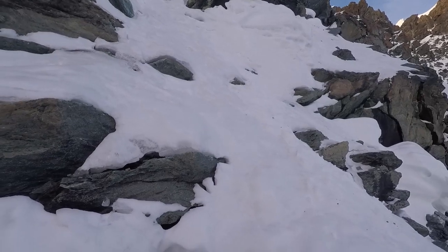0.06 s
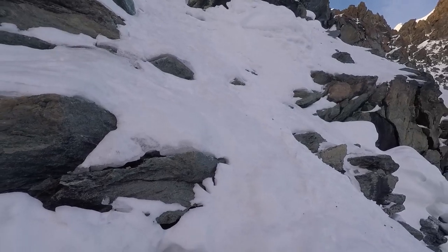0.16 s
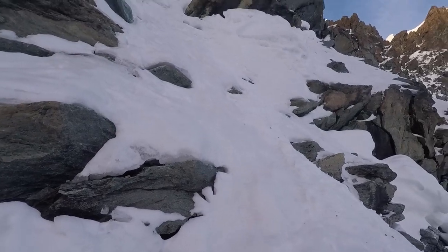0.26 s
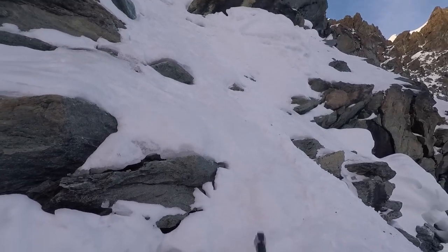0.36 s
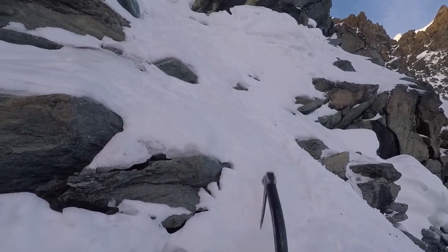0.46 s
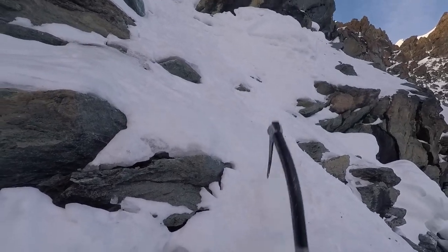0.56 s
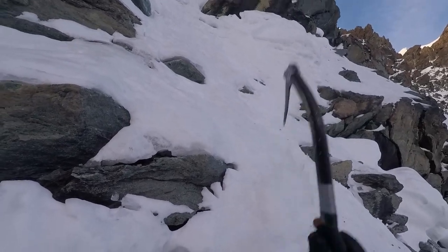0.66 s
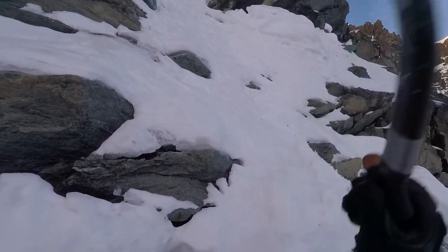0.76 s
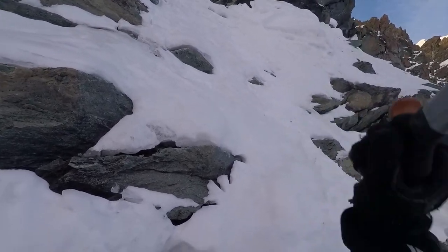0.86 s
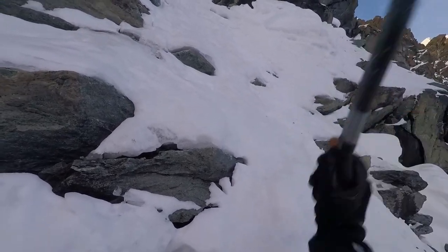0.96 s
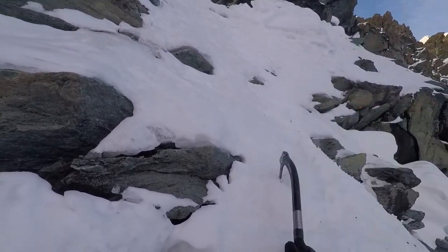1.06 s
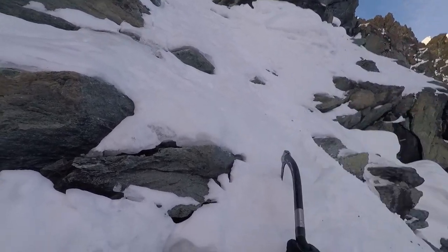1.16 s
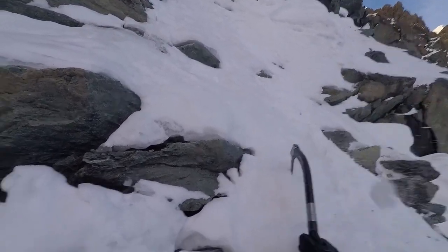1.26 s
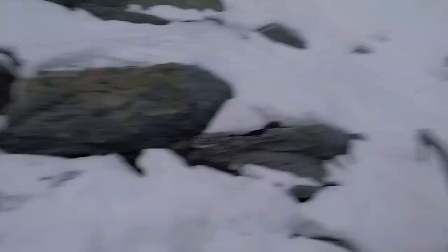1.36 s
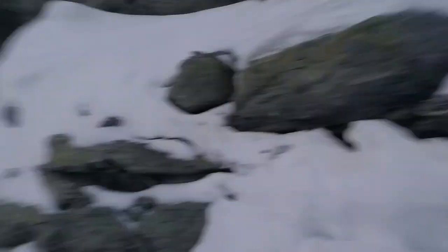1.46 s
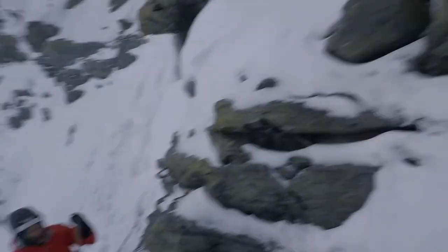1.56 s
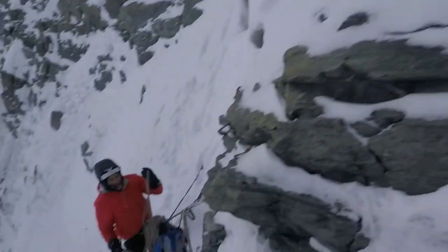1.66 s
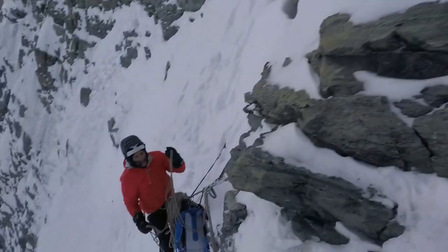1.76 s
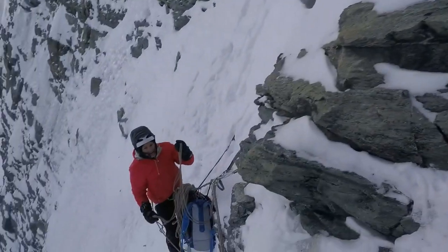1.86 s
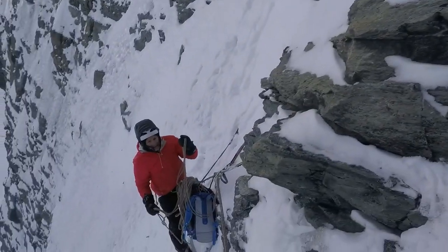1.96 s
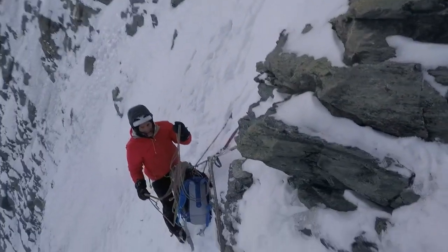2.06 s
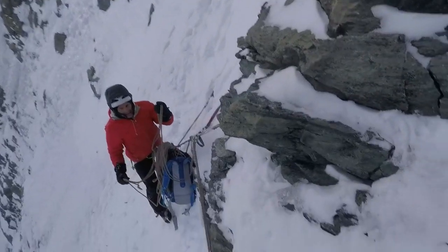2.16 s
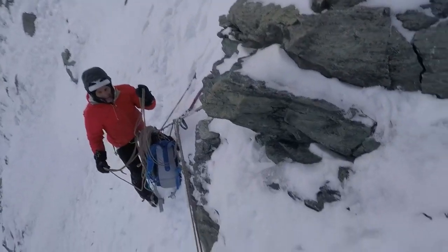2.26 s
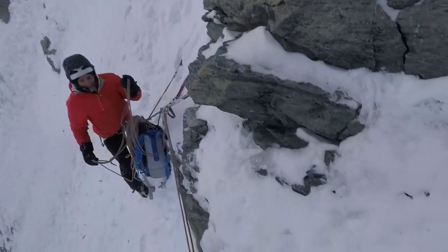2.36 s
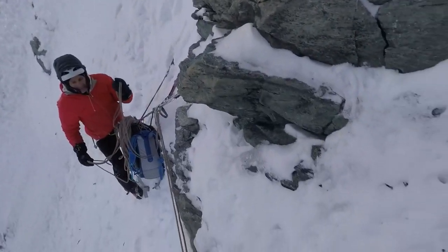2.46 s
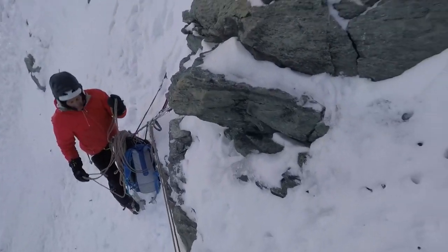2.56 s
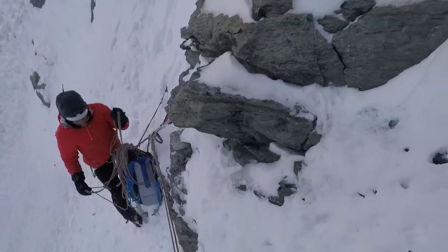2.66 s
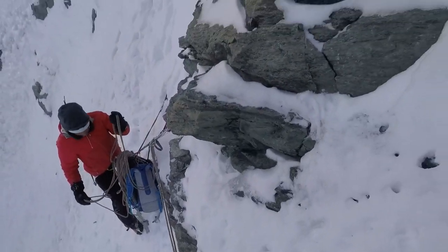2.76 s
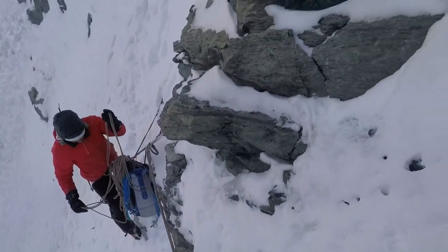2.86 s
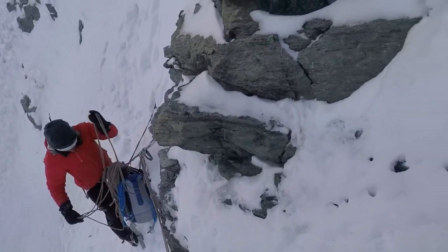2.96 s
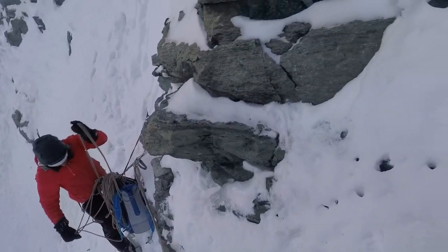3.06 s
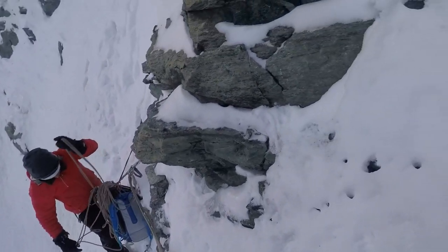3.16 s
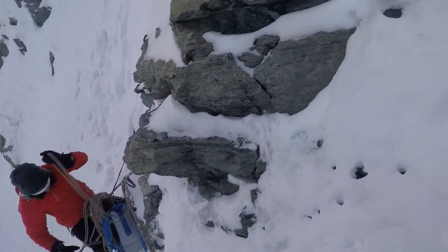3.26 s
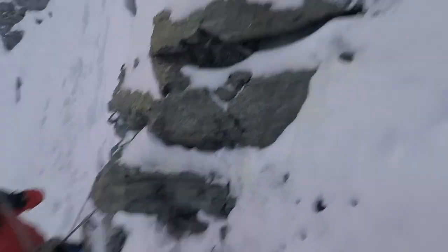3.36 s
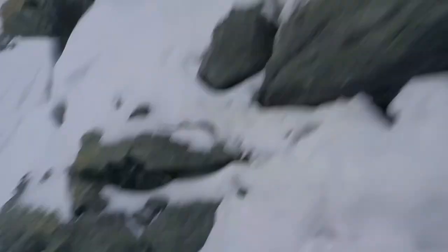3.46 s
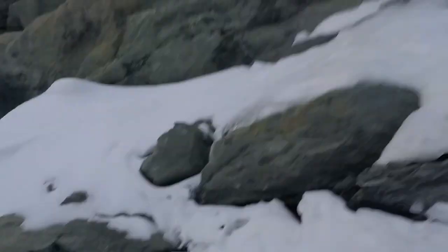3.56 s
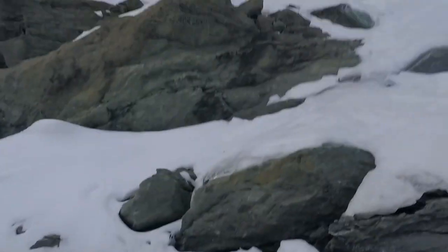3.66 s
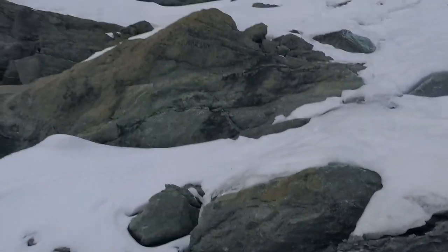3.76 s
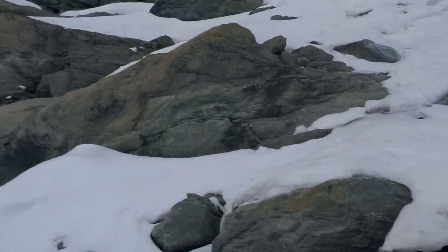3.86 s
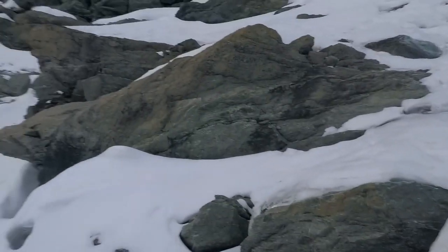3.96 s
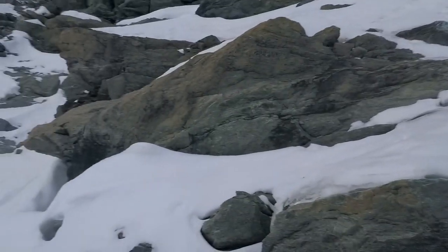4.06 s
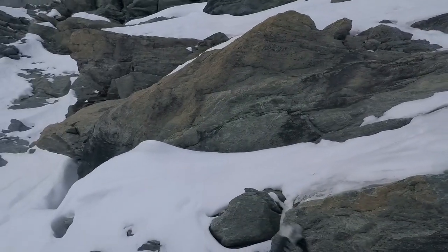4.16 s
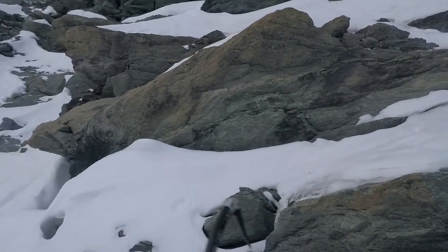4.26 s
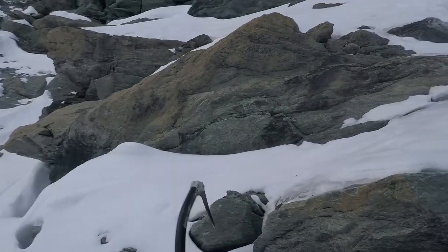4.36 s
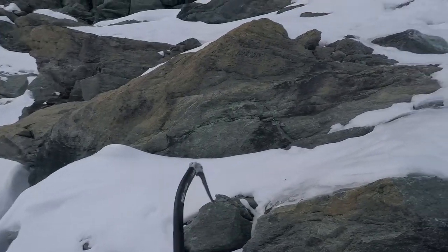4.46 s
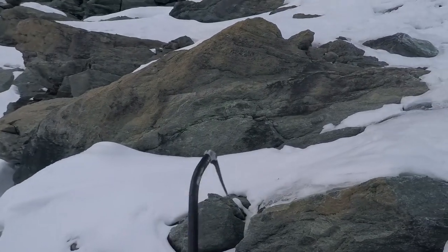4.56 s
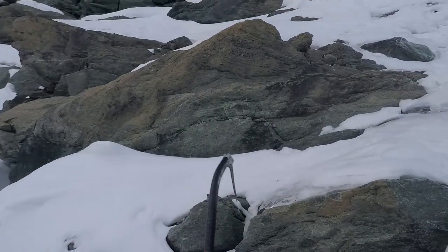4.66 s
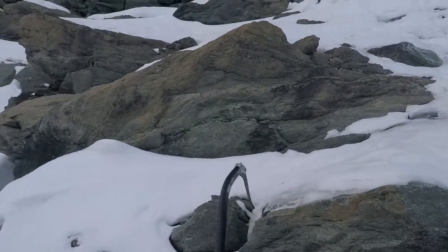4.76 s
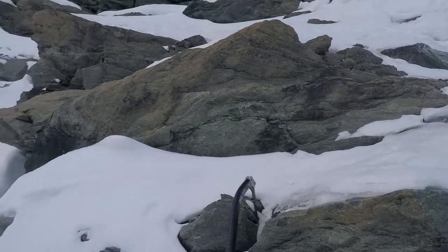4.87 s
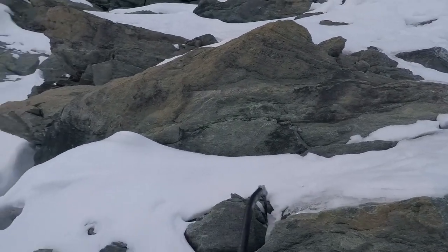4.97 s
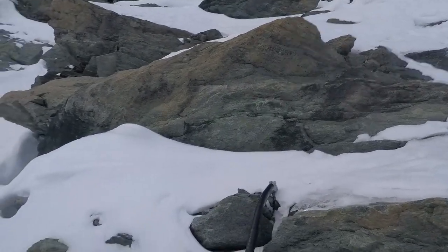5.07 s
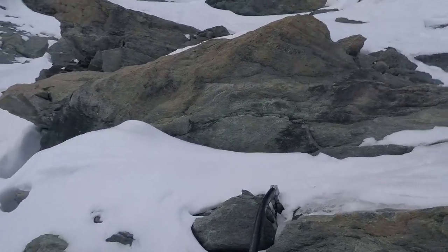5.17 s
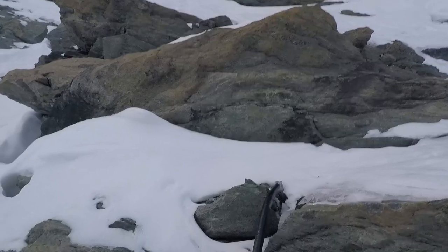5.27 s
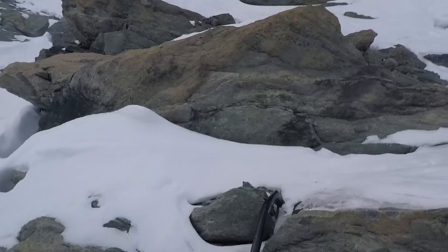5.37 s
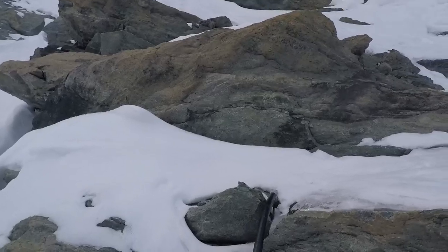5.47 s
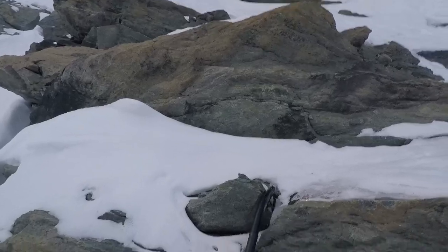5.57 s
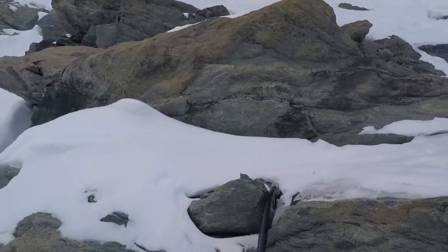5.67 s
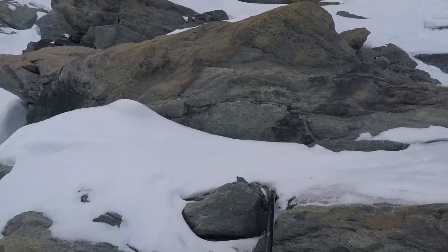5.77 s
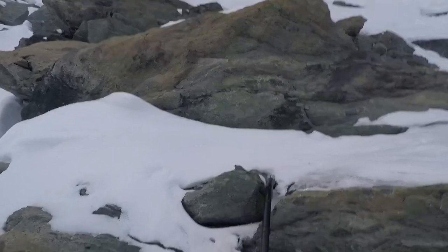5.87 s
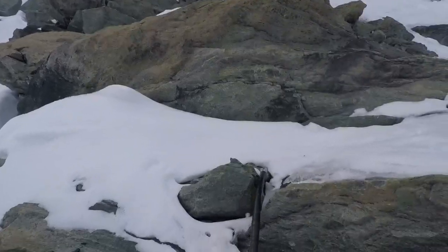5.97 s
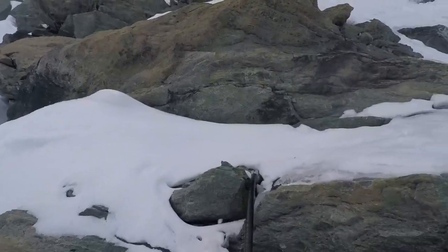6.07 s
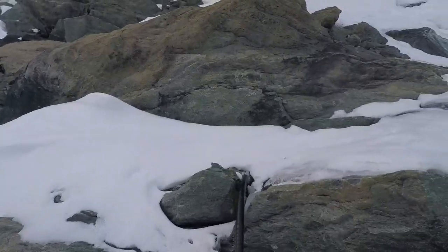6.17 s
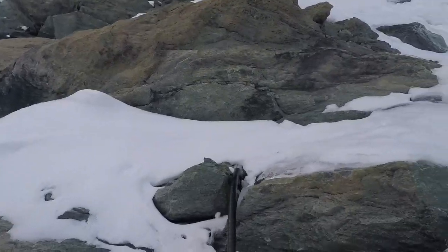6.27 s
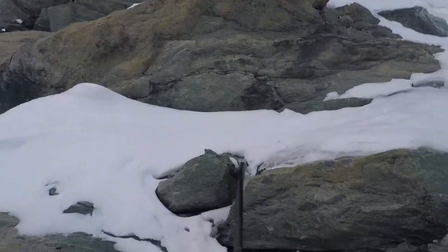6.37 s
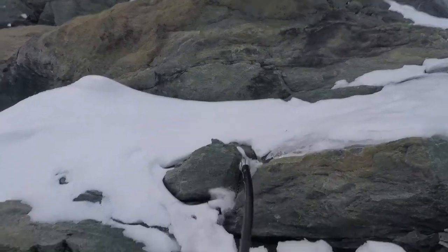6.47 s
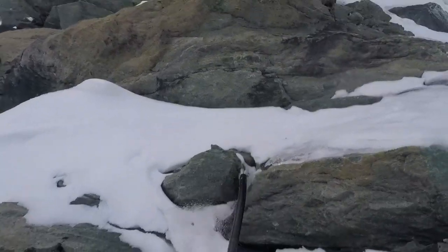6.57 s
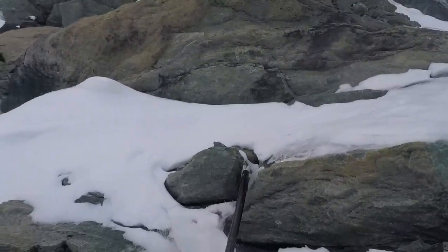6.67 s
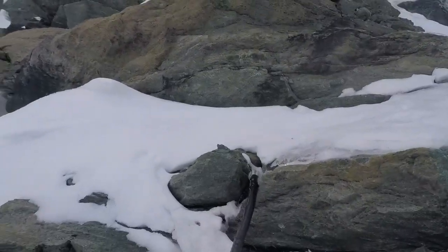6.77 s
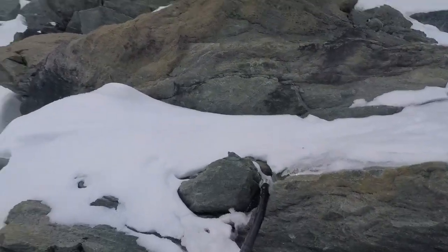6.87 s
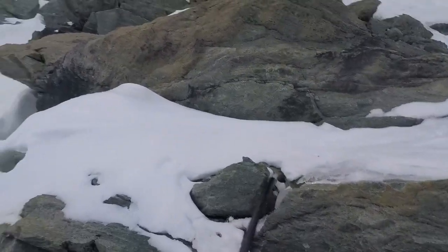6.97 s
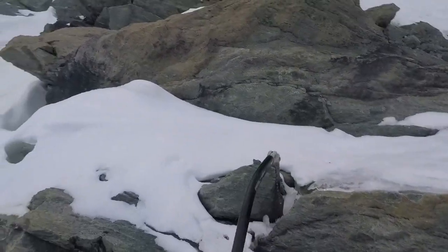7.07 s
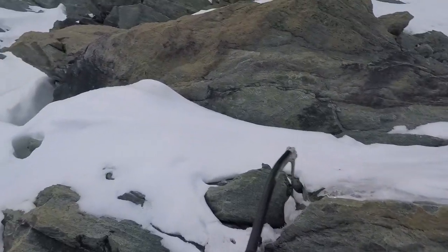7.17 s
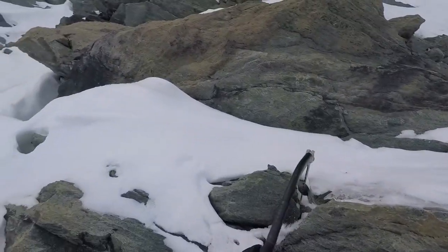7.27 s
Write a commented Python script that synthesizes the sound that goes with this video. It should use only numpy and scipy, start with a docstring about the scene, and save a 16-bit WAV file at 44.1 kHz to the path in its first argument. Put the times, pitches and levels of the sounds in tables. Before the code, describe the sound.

Fluttering low wind and faint hiss run throughout on an open snowy slope, heard close and dry from a helmet camera. Faint clinks and cloth rustle come first, then one sharp steel clank with a low thump. Small ticks, plastic creaks and a hood swish follow. Finally an ice axe chatters on rock in irregular clinks, peaking in a loud gritty scrape and hard knocks before thinning out.

```python
"""Low wind rumble, faint hiss and cloth rustle are heard first and run throughout; light steel clinks and
faint scraping start early, the strongest scraping comes late. A climber on a snowy slope taps an ice axe on
rock, hooks it in a crack and drags the pick along it: noise forces excite the steel's damped modes. Hardware
jingles; jacket and hood rustle as filtered grain noise. The helmet camera creaks (stick-slip) and thumps
(damped modes) in its mount; wind rumbles on its housing, and its electronics whine in regular pulses."""
import sys
import numpy as np
from scipy import signal
from scipy.fft import rfft, irfft
from scipy.io import wavfile
from scipy.ndimage import uniform_filter1d

SR = 44100
rng = np.random.default_rng(int(sys.argv[2]) if len(sys.argv) > 2 else 0)


def store_wav(level_fs):
    """Save 16-bit WAV to argv[1]."""
    pcm = np.round(np.clip(np.atleast_2d(level_fs), -1, 1) * 32767)
    wavfile.write(sys.argv[1], SR, pcm.T.astype(np.int16))


N = 322812
TIME = np.arange(N) / SR  # s
FIRM_DB = -45  # clank level of a firm blow: reference for its ring, ceiling for its rebound

# swings of the arm rock the camera: centre t/s, peak level/dB, f/Hz, half length/s
ARM_SWINGS = [(1.217, -12, 27.3, 0.032), (1.899, -33.5, 33, 0.012), (2.655, -25, 32, .014),
              (3.292, -25, 22.6, .036), (5.411, -27.5, 17.1, 0.035), (6.475, -31, 22.3, 0.067),
              (6.664, -23.5, 25, 0.026)]


def undb(db):
    """Amplitude gain is ten to the power of level/20."""
    return 10 ** (np.asarray(db) / 20)


def unit(x):
    """Normalise the mean power to one (rms 1)."""
    return x / np.sqrt(np.mean(x ** 2) + 1e-20)


def colour(x, points):
    """Minimum-phase filtering through (f/Hz, level/dB) points: a folded cepstrum keeps it causal."""
    size = 4096
    hz, db = np.transpose(points)
    grid = np.maximum(np.arange(size // 2 + 1) * SR / size, 1)
    level_db = np.interp(np.log(grid), np.log(hz), db)
    cepstrum = irfft(np.log(undb(level_db)))
    cepstrum[1:size // 2] *= 2
    cepstrum[size // 2 + 1:] = 0
    impulse_response = irfft(np.exp(rfft(cepstrum)))
    return signal.fftconvolve(x, impulse_response)[:len(x)]


def add(out, s, x):
    """Linear superposition: mix x into out from time s."""
    i = max(int(s * SR), 0)
    out[i:i + len(x)] += x[:max(N - i, 0)]


def grains(rate, spread_db):
    """Shot noise: random tiny impacts, a few much larger than the rest; rms 1."""
    sizes = undb(spread_db * np.minimum(rng.exponential(size=N), 4))
    hits = rng.random(N) < rate / SR
    return unit(hits * sizes * rng.choice([-1, 1], N))


def steady(x, seconds):
    """Short-time power normalisation evens out a noise's slow swings of level."""
    power = uniform_filter1d(x ** 2, max(int(seconds * SR), 2))
    return x / np.sqrt(power + 1e-9)


def walk(rate):
    """Slow random modulation: levels drawn rate times a second, joined by slopes; rms 1."""
    k = int(SR / rate)
    held = np.repeat(rng.standard_normal(N // k + 1), k)
    return unit(uniform_filter1d(held, k)[:N])


def strokes(rows, attack_s, release_s):
    """Exponential envelopes of (t/s, length/s, level/dB) movements: each rises, holds and dies away."""
    gain = np.zeros(N)
    for s, length, db in rows:
        outside = np.maximum(s - TIME, 0) / attack_s + np.maximum(TIME - s - length, 0) / release_s
        gain = np.maximum(gain, undb(db) * np.exp(-outside))
    return gain


def clinks(rattle_db=-22, rattle_s=0.012, grip=1.85, scuff_db=-17, scuff_s=0.0014, patchy_db=5.5):
    """Impact excitation: steel scuffs, bites and chatters; each blow balances clank, bite and sparkle."""
    chatter_ms, chatter_per_skid = 4.14, 0.6  # decay time in ms, and extra ms per ms of skid
    ring_at_firm_db, ring_per_db = -7.5, -0.15  # a harder blow presses the steel down and rings less
    out, lead = np.zeros(N), SR // 60  # lead leaves room for the scuff before contact
    t = TIME[:SR // 4] - lead / SR
    patches_hz = np.linspace(1400, 9000, 24)
    clank_band = signal.butter(2, [1200, 3400], "band", fs=SR, output="sos")
    for s, clank_db, bite_db, sparkle_db, skid_ms in blows():
        skid = max(skid_ms, .3) / 1000
        chatter = (chatter_ms + chatter_per_skid * skid_ms) / 1000
        since = np.maximum(t - skid, 0)
        decay = np.exp(-since / chatter) + undb(rattle_db) * np.exp(-since / rattle_s)
        scuff = undb(scuff_db) * np.exp(-np.abs(t) / scuff_s)
        pressure = np.clip(t / skid, 0, 1) * decay + scuff
        # every point of contact stresses different overtones
        patches = np.column_stack([patches_hz, patchy_db * rng.standard_normal(len(patches_hz))])
        force = colour(pressure * rng.standard_normal(len(t)), [(1200, 0), *patches, (10000, 0)])
        ring_db = ring_at_firm_db + ring_per_db * (clank_db - FIRM_DB)
        tone = [(2800, 0), (4500, bite_db), (6000, bite_db), (7800, sparkle_db + 12.0)]
        blow = colour(axe(force, ring_db, grip), tone)
        # the clank band just after contact sets the level of the whole blow
        clank = signal.sosfilt(clank_band, blow)[lead:lead + SR // 80]
        add(out, s - lead / SR, undb(clank_db) * blow / clank.std())
    return out


def blows():
    """Repeated contact: every blow has a soft rebound, and swinging hardware touches at random."""
    # steel on stone or other hardware: t/s, clank level/dB, bite re clank/dB,
    # sparkle re clank before a 12 dB lift/dB, skid-in/ms
    impacts = [(0.234, -56, -1, -9, 13.8), (0.263, -53.5, 1, -6, 1.6), (0.384, -54.5, 9, -7, 1.6),
               (0.445, -67, 12, -2, 1), (0.467, -65, 5, -6, 2.5), (1.1429, -31.5, 2, -7, 1.9),
               (3.218, -46, -2.5, -15, 8.8), (4.972, -45, 12, 2, 0.37), (4.987, -50.5, -1, -18, 0.37),
               (5.021, -50, -3, -16, 6), (5.035, -51.5, 13, -14, 1.1), (5.046, -45.5, -25, -20, 0.45),
               (5.074, -54.5, 7, -6, 0.37), (5.089, -51.5, 3, -15, 1.8), (5.187, -47.5, 7.5, -15, 3.8),
               (5.216, -58.5, -4, -15, 0.73), (5.274, -57, 7, -12, 0.9), (5.285, -43.5, 0, -19, 0.62),
               (5.378, -45, 6, -3, 9.3), (5.581, -58, 2, -12, 1.3), (5.618, -49, 7.5, -6, 3.7),
               (5.677, -61.5, 12, -11, 0.83), (5.785, -45.5, 0.5, 1.5, 0.44), (5.95, -53.5, -8, -27, 1),
               (6.023, -50.5, 5, -8, 3.3), (6.292, -48, 9, -19, 6.5), (6.418, -53, 16, -7, 1.2),
               (6.4395, -43.5, 25, -6, 2.3), (6.4595, -34.5, 9, -2, 0.72), (6.488, -41.5, 23, -10, 1.5),
               (6.546, -32.5, 5.5, -13.5, 5.3), (6.624, -48, 2, -12, 1.5), (6.639, -35, -3, -19, 3),
               (6.8256, -51.5, 1.5, -15, 1.4), (6.844, -51, 4.5, -18, 0.66), (6.861, -43.5, -18, -29, 2.1),
               (7.024, -66.5, 22, 7, 3.1), (7.087, -52, -4, -12, 0.83), (7.114, -38, 0, -15, 0.92),
               (7.2215, -44, -3, -14, 1.5), (7.238, -51, 11, -11, 4.9)]
    # hardware jingles faintly while the climber shifts: t/s, length/s
    jingle_spans = [(5.552, .14), (6.653, .05), (7.045, .2)]
    rebound_s, rebound_spread_s, rebound_db = 0.011, .03, -20
    jingles_per_s, jingle_db, jingle_bite_db, jingle_sparkle_db = 22, -61.5, 2, -5
    rows = list(impacts)
    for (s, db, bite_db, sparkle_db, skid_ms), late in zip(impacts, rng.random(len(impacts))):
        rebound_at = s + rebound_s + rebound_spread_s * late
        rows.append((rebound_at, min(db, FIRM_DB) + rebound_db, bite_db, sparkle_db, skid_ms))
    for start, length in jingle_spans:
        for slot in np.arange(0, length, 1 / jingles_per_s):
            touch_at = start + slot + rng.random() / jingles_per_s
            touch_db = jingle_db + 2 * rng.standard_normal()
            rows.append((touch_at, touch_db, jingle_bite_db, jingle_sparkle_db, 1))
    return rows


def axe(force, ring_db, grip, scatter_db=1.0):
    """Modal synthesis: a dry crack plus the ringing of the steel; a firmer grip damps it sooner."""
    # modes of the axe: f/Hz before slight detuning, relative level/dB, t60 at grip 1/s
    modes = [(1440, 0, .07), (2060, 2, .07), (2398, 4, .14), (2460, 4, .13), (2660, 3, .1), (3120, 8, .1),
             (3640, 4, .06), (4330, 8, .12), (4558, 9, .13), (4796, 6, .12), (5400, 3, .08), (5600, 4, .1),
             (5860, 10, .17), (5941, 5, .13), (6551, 8, .12), (6582, 8, .17), (7073, 7, .18),
             (7280, 10, .12), (7418, 6, .18), (7957, 14, .16), (8830, 7, .05), (11430, 8, .05)]
    # spectrum of steel on stone: f/Hz, level/dB
    crack = [(300, -29.5), (720, -15.5), (1220, -13), (1400, 4), (3050, 2.5), (3350, -3.5), (4500, 0.5),
             (5100, -5), (6200, -4.5), (6800, -9), (8800, -16), (9600, -20.5), (12000, -32.5),
             (15000, -25.5)]
    t = TIME[:SR // 5]
    hz, db, t60 = np.array(modes).T[:, :, None]
    damping = max(grip, .5) * np.log(1000) / t60
    # where the steel is touched decides which modes speak, and detunes them a little
    weight = undb(db + scatter_db * rng.standard_normal(db.shape))
    hz = hz * (1 + .0025 * rng.standard_normal(db.shape))
    phase = rng.random(db.shape)  # cycles
    partials = np.exp(-damping * t) * np.sin(2 * np.pi * (hz * t + phase))
    ring = (2 * damping / SR * weight * partials).sum(axis=0)
    ringing = signal.fftconvolve(force, ring)[:len(force)]
    return colour(force + undb(ring_db) * ringing, crack)


def drag(count=7, ring_db=1, shift_db=7, grip=1.66):
    """Frictional excitation: grain impacts at several contacts, with shifting load, ring the pick."""
    # strokes of the pick over rock: t/s, length/s, level/dB
    pick_strokes = [(.225, 0.027, -61), (.39, 0.072, -62), (5.31, 0.069, -60.5), (5.83, 0.13, -54),
                    (6.12, 0.2, -64.5), (6.315, 0.057, -50), (6.44, 0.073, -29), (6.55, 0.14, -52.5)]
    scrape = np.zeros(N)
    for _ in range(count):
        force = grains(rate=350, spread_db=1.5) * undb(shift_db * walk(rate=60))
        scrape += axe(unit(force), ring_db, grip, scatter_db=3.5)
    scrape = colour(scrape, [(1500, -1.5), (4300, 2.0), (6200, 1.5), (8000, 6.5), (11000, -1)])
    return steady(scrape, 0.068) * strokes(pick_strokes, attack_s=0.0095, release_s=0.025)


def creaks(count=9, slip_ms=1.29, jitter=0.39, settle_ms=0.75):
    """Stick-slip friction: plastic slips about every 1.3 ms, harder up to the snap, then settles."""
    # creaks of the mount: snap t/s, level/dB, brightness f/Hz, build-up/ms, body level/dB
    snaps = [(1.2273, -46.5, 1680, 4.8, -18), (1.7246, -32.5, 3500, 1.73, -9), (2.5362, -47, 1370, 3, -15),
             (2.5416, -43, 1460, 2.5, -14), (3.522, -45.5, 1940, 3.6, -3.5),
             (3.564, -39.5, 1350, 2.9, -3.5), (3.5867, -41, 1460, 9.3, -6), (5.311, -48.5, 1570, 1.5, -1),
             (5.317, -37, 1670, 3.3, -1.5)]
    # spectrum of the camera shell: f/Hz, level/dB
    shell_response = [(300, 4), (400, 5), (540, 1), (740, 2), (930, -3.5), (1130, 0.5), (1320, 0.5),
                      (1550, 2), (2000, -1.5), (2800, 3), (4000, 0)]
    out, size, lead = np.zeros(N), SR // 40, SR // 100
    order = np.arange(count) - 2 * count // 3  # zero is the snap
    for s, db, bright_hz, build_ms, body_db in snaps:
        ms = slip_ms * (order + jitter * rng.standard_normal(count) * (order != 0))
        slips = np.zeros(size)
        places = np.clip(lead + (ms * SR / 1000).astype(int), 0, size - 1)
        slips[places] = np.exp(np.where(ms < 0, ms / max(build_ms, .3), -ms / settle_ms))
        body = [(60, body_db - 36), (200, body_db + 0.5), (380, body_db + 1)]
        rolloff = [(.5 * bright_hz, 0), (bright_hz, -3), (1.7 * bright_hz, -14),
                   (3.0 * bright_hz, -30), (7 * bright_hz, -52)]
        creak = colour(colour(slips, body + rolloff), shell_response)
        add(out, s - lead / SR, undb(db) * unit(creak))
    return out


def ticks():
    """Short broadband impulses: exponentially decaying bright noise, dry and without ringing."""
    # buckles and ice crumbs: t/s, nominal peak level/dB
    tick_times = [(1.467, -48), (1.544, -39.5), (1.5893, -46), (2.4307, -43.5), (2.774, -46), (2.9528, -47),
                  (3.015, -41), (3.1105, -42), (3.3873, -36.5), (3.4703, -44), (4.075, -47.5),
                  (4.385, -44.5)]
    spectrum = [(1000, -2.5), (2500, 5.5), (4500, 3.5), (9000, -6.5), (15000, -13)]
    out, t = np.zeros(N), TIME[:SR // 20]
    for s, peak_db in tick_times:
        tick = unit(colour(rng.standard_normal(len(t)), spectrum))
        # noise peaks stand about 10.5 dB over its rms
        add(out, s, undb(peak_db - 10.5) * tick * np.exp(-t / 0.0063))
    return out


def bumps():
    """Damped resonance: body movements make the camera bounce briefly on its mount."""
    # body movements: t/s, level before the sum of modes/dB
    knocks = [(0.384, -50.5), (0.742, -48.5), (1.171, -49), (1.211, -27.5), (1.725, -45.5), (3.52, -41),
              (3.56, -42.5), (3.953, -42.5), (4.689, -49), (5.253, -46.5), (5.316, -45.5), (5.479, -40.5),
              (5.599, -43), (5.691, -47), (5.902, -45.5), (5.981, -41.5), (6.366, -40), (6.44, -43),
              (6.542, -39.5), (6.629, -31.5), (6.687, -36)]
    # modes of the camera on its mount: f/Hz, level/dB, t60/s
    mount_modes = [(69.6, 1.5, 0.19), (126.7, 3, 0.14), (390, -12.5, 0.049), (727, -10.5, 0.049)]
    out, t = np.zeros(N), TIME[:SR // 4]
    bounce = np.zeros(len(t))
    for hz, db, t60 in mount_modes:
        bounce += undb(db) * np.sin(2 * np.pi * hz * t) * np.exp(-np.log(1000) * t / t60)
    soft_onset = 1 - np.exp(-t / 0.0046)
    for s, knock_db in knocks:
        add(out, s, undb(knock_db) * bounce * soft_onset)
    return out


def sways():
    """Low-frequency oscillation in a Gaussian envelope: the camera rocks with each arm swing."""
    out = np.zeros(N)
    for s, peak_db, hz, half in ARM_SWINGS:
        envelope = np.exp(-.5 * ((TIME - s) / half) ** 2)
        out += undb(peak_db) * envelope * np.cos(2 * np.pi * hz * (TIME - s))
    return out


def rustle(points, rate, spread_db, clump_db):
    """Granular friction: dense little catches of fibres that come in clumps."""
    catches = grains(rate, spread_db) * undb(clump_db * walk(rate=70))
    return unit(colour(catches, points))


def jacket(rest_db=-71):
    """Fibre friction: arm and shoulder movements add in power to a faint constant rustle."""
    # arm and shoulder movements: t/s, length/s, level/dB
    moves = [(0, 0.43, -68.5), (1.12, 0.13, -58), (1.43, 0.37, -62.5), (2.33, 0.11, -61.5),
             (2.6, 0.31, -70), (3.41, 0.15, -51), (3.91, .17, -60.5), (5.33, 0.075, -58.5),
             (5.85, 0.88, -66)]
    # spectrum of the cloth: f/Hz, level/dB
    cloth = [(200, -16), (500, -16), (720, -9), (1000, -18), (1300, -14), (1550, -2), (1780, 0), (2100, -9),
             (2650, -7), (3400, -18), (6000, -24), (12000, -36)]
    movement = np.hypot(strokes(moves, attack_s=0.039, release_s=0.04), undb(rest_db))
    return rustle(cloth, rate=4000, spread_db=3.5, clump_db=3.0) * movement


def hood():
    """Fibre friction: the hood brushes the helmet as the head turns."""
    # brushes of the hood: t/s, length/s, level/dB
    swishes = [(3.585, 0.12, -49.5), (3.75, 0.053, -54.5)]
    # spectrum of hood on helmet: f/Hz, level/dB
    brush = [(300, -28), (1150, -10.5), (1600, 3.5), (2600, 1), (3200, -8.5), (3700, -3), (4600, -3),
             (5200, -9), (5800, -3), (6700, -23), (7600, -8), (9000, -20.5), (15000, -33)]
    movement = strokes(swishes, attack_s=0.03, release_s=0.023)
    return rustle(brush, rate=3000, spread_db=2.5, clump_db=2.2) * movement


def wind(push_db=-19, spread=2.5, flutter_db=2.5):
    """Turbulent pressure noise: a fluttering rumble; each arm swing pushes more air past the housing."""
    # wind on the housing: t/s, strength before flutter/dB
    strength = [(0, -43), (.8, -40.5), (1.7, -44), (3.3, -43.5), (4.2, -45), (4.8, -47.5), (5.3, -39.5),
                (5.8, -42.5), (6.5, -34.5), (7.32, -42.5)]
    # spectrum of rumble with lighter buffeting above it: f/Hz, level/dB
    rumble = [(10, 7.5), (20, 0.5), (29, 5), (40, -5.5), (55, -12), (80, -17), (105, -18.5), (140, -22),
              (190, -38), (300, -43.5), (700, -47.5), (8000, -110)]
    push = np.zeros(N)
    for s, peak_db, _, half in ARM_SWINGS:
        push += undb(peak_db + push_db) * np.exp(-.5 * ((TIME - s) / (spread * half)) ** 2)
    seconds, level_db = np.transpose(strength)
    gusts = undb(np.interp(TIME, seconds, level_db)) * undb(flutter_db * walk(rate=8.3))
    turbulence = steady(unit(colour(rng.standard_normal(N), rumble)), 0.101)
    return turbulence * np.hypot(gusts, push)


def electronics(whine_hz=8620, wander_rate=170, whine_db=-79, duty=0.07, hiss_db=-67):
    """Stationary noise and amplitude modulation: steady hiss, and a narrow whine pulsing every frame."""
    # spectrum of the hiss: f/Hz, level/dB
    hiss_spectrum = [(120, -7.5), (200, -2.5), (350, -2), (570, -5.5), (720, -5.5), (1100, -7.5),
                     (1750, -7), (2650, -8), (5000, -9), (8700, -15), (15000, -21)]
    frame_hz = 29.97
    phase = (TIME - .0215) * frame_hz  # cycles; a pulse peaks at each whole number
    gate = np.exp(-.5 * (((phase + .5) % 1 - .5) / duty) ** 2)
    # a random phase wander of 1 rad rms broadens the line
    whine = gate * np.sin(2 * np.pi * whine_hz * TIME + walk(wander_rate))
    hiss = unit(colour(rng.standard_normal(N), hiss_spectrum))
    return undb(hiss_db) * hiss + undb(whine_db) * unit(whine)


def scene():
    """Free-field superposition: open snow returns no echo, so everything is close and dry."""
    contacts = clinks() + drag() + creaks() + ticks()
    movements = bumps() + sways() + jacket() + hood()
    return (contacts + movements + wind() + electronics())[None]


def record(dry):
    """Band limitation: the camera cuts the top with a steep elliptic low-pass at 15.3 kHz."""
    low_pass = signal.ellip(10, .2, 70, 15300, fs=SR, output="sos")
    return signal.sosfilt(low_pass, dry)


dry = scene()
out = record(dry)
store_wav(out)
```